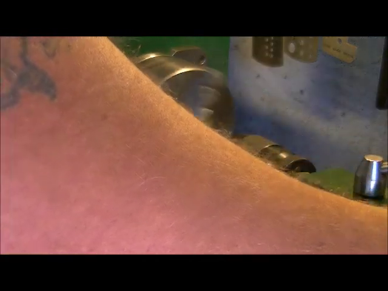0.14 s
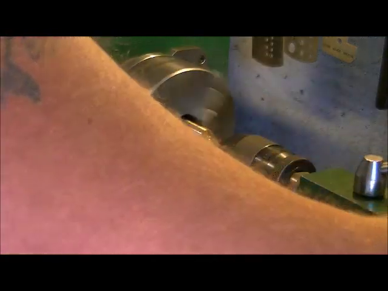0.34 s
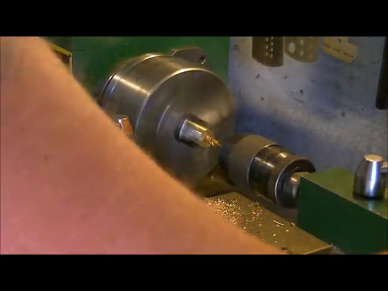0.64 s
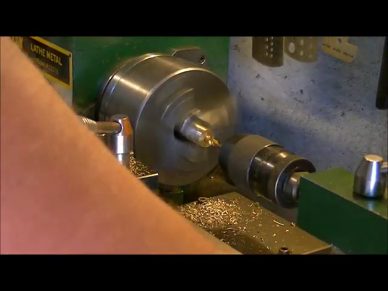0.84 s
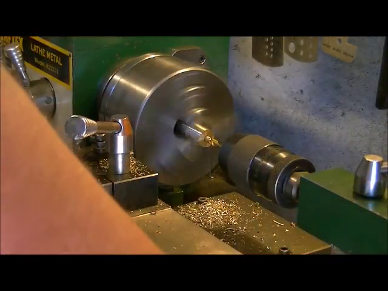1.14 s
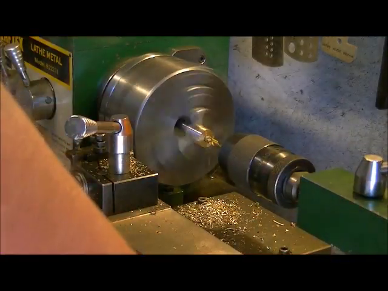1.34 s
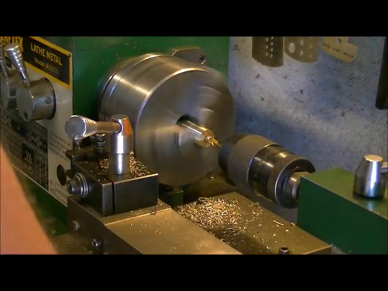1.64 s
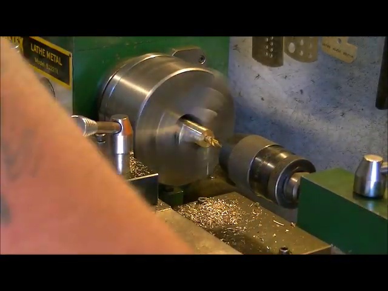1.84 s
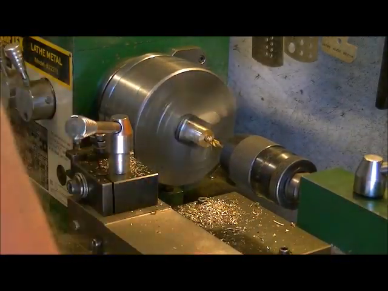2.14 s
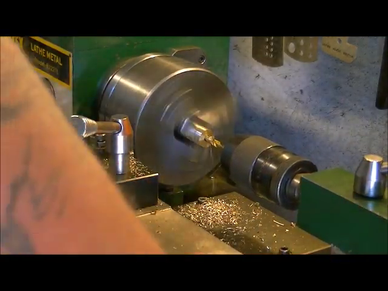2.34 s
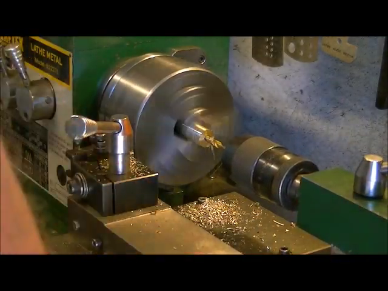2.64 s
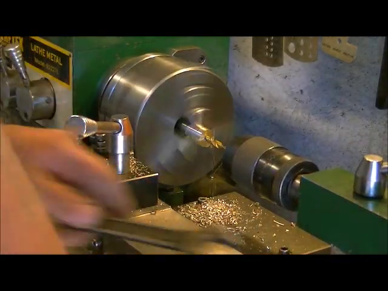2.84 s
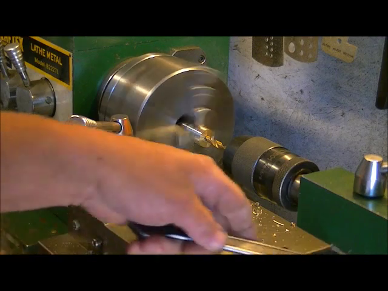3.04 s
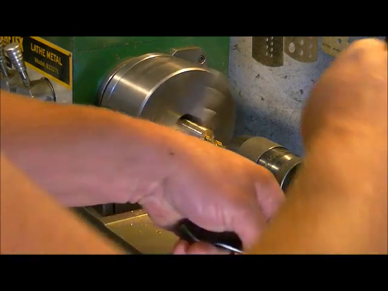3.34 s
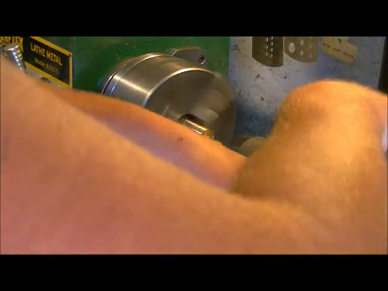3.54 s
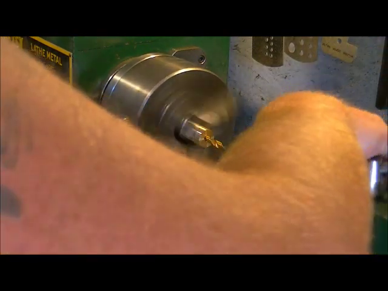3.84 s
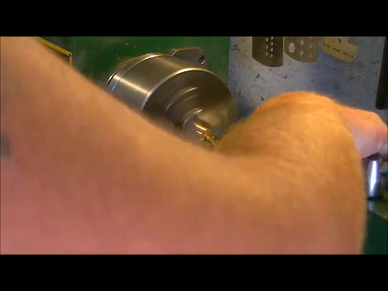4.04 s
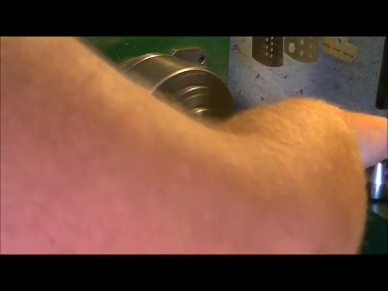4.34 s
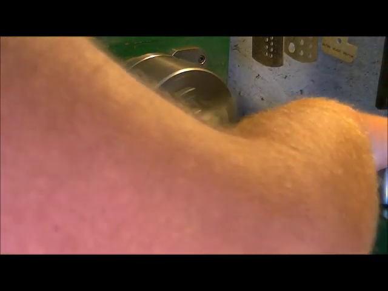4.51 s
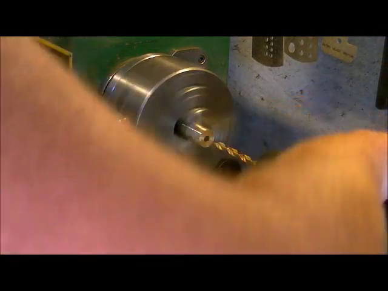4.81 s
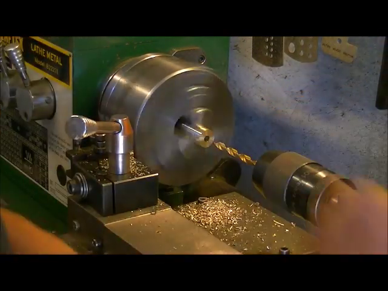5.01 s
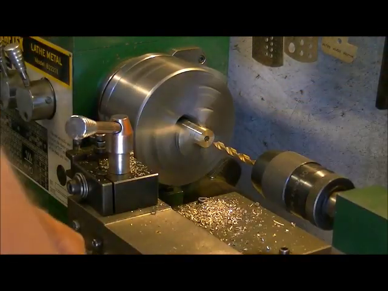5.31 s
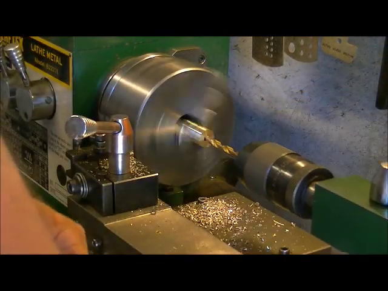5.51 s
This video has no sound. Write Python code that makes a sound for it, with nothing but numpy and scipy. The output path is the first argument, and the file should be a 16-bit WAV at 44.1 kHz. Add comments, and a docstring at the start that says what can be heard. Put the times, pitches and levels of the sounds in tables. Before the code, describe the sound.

A small metal lathe whirs and rattles steadily while a drill bit boring brass squeals high and wavering, then steps upward and stops.

```python
"""Drilling brass on a small lathe

A small benchtop lathe runs steadily while a twist drill bores into spinning brass. Random blows from gear teeth
ring the castings, throbbing with the shafts and the motor's mains pulsation, over a faint hum of sine tones.
The drill's squeal is a wavering tone with overtones that drops in pitch at each bite; near the end, as the drill
is backed out, it steps up and dies. Chips fizz, small parts chatter and tick, and the bench thuds softly."""
import sys
import numpy as np
from scipy import signal
from scipy.fft import rfft, irfft, next_fast_len
from scipy.io import wavfile
from scipy.ndimage import uniform_filter1d

SR = 44100
rng = np.random.default_rng(int(sys.argv[2]) if len(sys.argv) > 2 else 0)


def unload_wav(signal):
    """Save mono or channel-first audio to the path in sys.argv[1] as 16-bit WAV at rate SR, clipped to [-1, 1]."""
    wavfile.write(
        sys.argv[1],
        SR,
        np.round(np.clip(np.atleast_2d(signal).T, -1, 1) * 32767).astype(np.int16),
    )


N = 250047
T = np.arange(N) / SR  # time of each sample in seconds


def undb(db):
    """Turn decibels into a gain."""
    return 10 ** (np.asarray(db) / 20)


def unit(x):
    """Scale a sound to an rms (average strength) of 1."""
    return x / np.sqrt(np.mean(x ** 2))


def curves(table):
    """Join the rows of a timed table by straight lines: one curve per column, one value a sample."""
    seconds, *columns = np.transpose(table)
    return [np.interp(T, seconds, column) for column in columns]


def band(x, lo_hz, hi_hz, order=2):
    """Keep only the pitches between two limits (Butterworth band-pass)."""
    edges_hz = [lo_hz, min(hi_hz, .45 * SR)]
    return signal.sosfilt(signal.butter(order, edges_hz, "band", fs=SR, output="sos"), x)


def fade_60db(t, t60):
    """Die away by 60 dB in t60 seconds, as a struck object or a room does."""
    return np.exp(-np.log(1000) * t / t60)


def walk(rate):
    """Smooth random wander of rms 1, drifting to a new value about rate times a second."""
    hold = max(int(SR / rate), 2)
    steps = np.repeat(rng.standard_normal(N // hold + 1), hold)
    smooth = uniform_filter1d(uniform_filter1d(steps, hold), hold)
    return unit(smooth[:N])


def impacts(per_second, scatter_db):
    """Dense small blows at random moments, uneven in size and random in direction."""
    hit = rng.random(N) < per_second / SR
    direction = rng.choice([-1, 1], N)
    size = undb(scatter_db * rng.standard_normal(N))
    return unit(hit * direction * size)


def castings(x):
    """Ring a force through the machine's resonances; returns the spectrum and its frequencies."""
    # Broad colour of the machine. Each row: frequency in Hz, gain in dB.
    body = [(40, -45), (135, -53), (230, -31), (300, -2.5), (600, 0.5), (1000, -2), (2400, -1.5),
            (3200, -3), (4100, -2), (5400, -11), (7300, -18), (9500, -31.5), (12000, -49), (15000, -80)]
    # Resonances of headstock, bed and covers. Each row: frequency in Hz, width in Hz, lift in dB.
    lathe_modes = [(343.8, 14, 5.5), (435, 22, 6), (508, 10.4, 9.5), (615.7, 16.8, 9), (646.5, 56, 13),
                   (722, 46, 8), (781, 30, 10.5), (842, 18, 4), (899.5, 31, 9), (952, 18, 4.5),
                   (1029, 17, 6), (1133.7, 30, 13.5), (1234, 85, 6), (1281, 25, 9.5), (1384, 80, 7),
                   (1616, 43, 4.5), (1904, 170, 5.5), (2103, 36, 9), (2281, 49, 9.5), (2517, 91, 6.5),
                   (2730, 36, 5), (3010, 23, 4.5), (3840, 39, 3.5), (4106, 54, 6)]
    size = next_fast_len(N + SR // 2, True) * 2
    f = np.arange(size // 2 + 1) * SR / size
    hz, db = np.transpose(body)
    gain_db = np.interp(np.log(f + 1), np.log(hz), db)
    for centre, width, lift in lathe_modes:
        gain_db = gain_db + lift / (1 + (2 * (f - centre) / width) ** 2)
    # minimum phase: every resonance rings after its blow, not before
    cepstrum = irfft(np.log(undb(gain_db)))
    cepstrum[1:size // 2] *= 2
    cepstrum[size // 2 + 1:] = 0
    return rfft(x, size) * np.exp(rfft(cepstrum)), f


def gears(rub_db=-4, scatter_db=2.3, flutter_db=.7, surge_db=.9, swell_db=0.17,
          drone_db=-0.22, rattle_db=0, hiss_db=7.5):
    """Tooth impacts and bearing rub ring the castings, swelling with each turn of the shafts."""
    # Slow levels of the running gear, before the trims drone_db, rattle_db and hiss_db are added.
    # Each row: time in seconds, headstock drone in dB, gear rattle in dB, tooth hiss in dB.
    run = [(0.0, -25, -28.2, -49), (0.7, -25.5, -28.7, -48.5), (1.2, -24.5, -30, -50),
           (1.52, -24.5, -27.5, -52), (1.62, -24, -25, -47), (2.0, -26, -25, -43.5), (2.1, -25, -27, -47.0),
           (2.5, -25, -24.5, -44), (3.15, -23.5, -25.5, -44.5), (3.28, -24.5, -23.5, -42),
           (3.45, -25.5, -26.5, -47), (3.65, -26.5, -26, -43), (3.75, -25, -25, -44),
           (4.1, -23.5, -26, -44), (4.3, -23.5, -24.0, -43.5), (5.67, -23.2, -24, -42.5)]
    # Cyclic load on the gears from the turning shafts and the mains.
    # Each row: rate in Hz, first crest in seconds, depth in the drone, in the rattle, in the hiss (shares of 1).
    throbs = [ (6.39, .129, .01, .025, .03), (14.3, .033, .035, .08, .15), (18.63, .022, .1, .06, .11),
              (35.7, .0165, .05, .1, .11), (120, .0036, .1, .07, .08), ]
    force = impacts(3000, scatter_db) + undb(rub_db) * rng.standard_normal(N)
    spectrum, f = castings(force)
    # three regions of the spectrum, meeting at 1500 and 4700 Hz
    above_drone, above_rattle = (1 - 1 / (1 + (f / hz) ** 12) for hz in (1500, 4700))
    shares = (1 - above_drone, above_drone - above_rattle, above_rattle)
    trims_db = (drone_db, rattle_db, hiss_db)
    backlash_db = flutter_db * walk(60) + swell_db * walk(12)
    out = 0
    for k, (share, db, trim_db) in enumerate(zip(shares, curves(run), trims_db)):
        load = 1
        for rate, crest, *depth in throbs:
            load = load + depth[k] * np.cos(2 * np.pi * rate * (T - crest))
        # loose teeth make the rattle and hiss surge; the heavy headstock (k = 0) drones on evenly
        loose_db = np.sqrt(k) * (backlash_db + surge_db * walk(110))
        layer = irfft(spectrum * share)[:N] * load * undb(loose_db)
        out = out + unit(layer) * undb(db + trim_db)
    return out


def boom(x, edge_hz=340):
    """The lowest part of the drone slowly loses weight."""
    # Gain of everything below the edge. Each row: time in seconds, gain in dB.
    boom_gain = [(0, 2), (1.4, 1.5), (2.4, -1), (3.6, -1), (5.67, -3)]
    low = signal.sosfiltfilt(signal.butter(3, edge_hz, fs=SR, output="sos"), x)
    return x + (undb(curves(boom_gain)[0]) - 1) * low


def motor():
    """Magnetic hum at twice the mains rate and its octave."""
    # Each row: frequency in Hz, rms level in dB.
    hum = [(120, -81.5), (240, -63)]
    return sum(np.sqrt(2) * undb(db) * np.sin(2 * np.pi * hz * T) for hz, db in hum)


def bites(grab_s=.011, let_go_s=.012):
    """Each bite of the lips loads the drill, pulling the pitch down and changing the level; returns Hz and dB."""
    # Each row: start in seconds, length in seconds, drop in pitch at the end in Hz,
    # drop at the start as a multiple of that, lift of the squeal in dB, change in level on letting go in dB.
    bite_table = [(0, 0.046, 115, 1, -0.5, 2), (0.099, 0.091, 292, .15, 3.5, 0),
                  (0.189, .038, 110, 1, 1, 3), (0.261, 0.075, 320, .2, 4, -3),
                  (.326, 0.025, 221, 1, 9.5, -2), (.348, 0.031, 190, 1, 1, -3), (0.407, .028, 100, 1, 0, 0),
                  (.469, 0.035, 330, .8, 8, -6), (.563, 0.029, 292, .95, -3, 6),
                  (.618, 0.047, 300, .45, 6, 1), (.717, .026, 259, 1, -2, 3), (.774, .046, 330, 1.05, 5, 0),
                  (.832, .024, 130, 1, -3, 4), (0.866, .036, 311, 1, 0, 2), (0.926, 0.053, 370, .7, 7, -1),
                  (0.98, 0.091, 321, .95, -4, 5), (1.079, .046, 322, 1, 7.5, 3),
                  (1.134, 0.029, 200, 1, 4, -5), (1.165, .068, 370, .7, -3.5, -4),
                  (1.221, .056, 299, .55, 4, 2), (1.297, 0.13, 385, .95, 0, 3),
                  (1.437, 0.15, 370, 1.1, 2, 0), (1.606, 0.025, 130.5, 1, -1, 1),
                  (1.646, .052, 400, .9, 2, 1), (1.712, .034, 303, .9, 5, 0),
                  (1.785, 0.055, 375, .4, -3, -2), (1.861, 0.031, 149, 1, 0, 0),
                  (1.976, .034, 171, .7, 4, 1), (2.113, .056, 180.4, .6, 4, -1),
                  (2.286, .036, 190, .9, -1, 0), (2.563, .08, 90.3, .8, 2, 4),
                  (2.683, .065, 230, .1, 1, -13), (2.825, 0.029, 380, 1, 1, -5),
                  (2.841, 0.062, 260, 1.1, -1.5, -3), (2.981, 0.082, 241, 1, 4, -6),
                  (3.131, 0.07, 617, .72, 0, -12), (3.178, 0.051, 200, 1, -2, 2),
                  (3.276, 0.13, 670, .68, 3.5, -12), (3.426, 0.099, 630, .58, 3.5, -13),
                  (3.581, .03, 470, 1, -2, -6), (3.598, 0.089, 619, .5, 3, -14),
                  (3.708, 0.052, 471, .62, -3, 4), (3.75, 0.084, 623, .5, 5, -18),
                  (3.901, 0.1, 611, .42, 5.5, -16), (4.048, .088, 470, .72, 4, -18),
                  (4.224, 0.036, 269, 1, 2, -8), (4.275, 0.061, 320, .3, 4, -12)]
    sag_hz, lift_db = np.zeros((2, N))
    for s, length, depth_hz, at_once, db, break_db in bite_table:
        corners = s + np.sort([0, grab_s, length - let_go_s, length])
        depth = np.interp(T, corners, [0, at_once, 1, 0])
        letting_go = np.exp(-((T - corners[2:].mean()) / (0.46 * let_go_s)) ** 2)
        sag_hz += depth_hz * depth
        lift_db += db * depth + break_db * letting_go
    return sag_hz, lift_db


def cling(hz, reach_hz=75.4, share=.45):
    """The drill's resonances draw the pitch partly towards them; returns the pitch and the change in level in dB."""
    # Resonances of the drill. Each row: frequency in Hz, lift of the squeal in dB.
    drill_modes = [(4470, -1), (4700, 1), (4870, 1.5), (5180, 0)]
    pulled, ring_db = hz, 0
    for mode_hz, db in drill_modes:
        near = np.exp(-((hz - mode_hz) / reach_hz) ** 2)
        pulled = pulled - min(share, 1) * near * (hz - mode_hz)
        ring_db = ring_db + db * near
    return pulled, ring_db


def stick_slip(hz, ragged, hop_hz=72, tremble_hz=40, shaft_hz=12, waver_hz=16):
    """Phase of the squeal: the pitch wavers with the load, hops as chips break off and trembles between hops."""
    # The gear shaft that sways the pitch: rate in Hz, first crest in seconds.
    shaft_rate, shaft_crest = (18.63, .036)
    chip = np.cumsum(rng.random(N) < 190 / SR)  # running count of chips, about 190 a second
    hops = uniform_filter1d(rng.uniform(-1, 1, N)[chip], size=SR // 600)
    tremble = walk(650)
    shaft_sway = shaft_hz * np.cos(2 * np.pi * shaft_rate * (T - shaft_crest))
    waver = waver_hz * walk(80) + shaft_sway
    pitch_hz = hz + waver + ragged * (hop_hz * hops + tremble_hz * tremble)
    return 2 * np.pi * np.cumsum(pitch_hz) / SR


def drill(flicker_db=3.1, overtone_flicker_db=3.5, squeal_db=-1.14, chips_db=-36.5, rasp_db=-18.5,
          harsh_db=5.5, steady_hz=450, resonance_hz=5085, fade_db_per_hz=0.08, rub_db=-10.5):
    """The cutting lips stick and slip at a resonance of the drill, over a faint fizz of fine chips."""
    # How the feed sets the squeal: higher as the pressure eases, climbing in steps as the drill is backed out.
    # Each row: time in seconds, pitch between bites in Hz before the resonances pull it,
    # starting level in dB before the other level changes, raggedness (0 is smooth, higher is rougher).
    feed = [(0, 4790, -30, 0.63), (.08, 4793, -26, 0.75), (.25, 4780, -25.5, .6), (.47, 4755, -26.5, 0.81),
            (.497, 4970, -29, 1), (.52, 4800, -22, .8), (.555, 4880, -26.5, .8), (.6, 4760, -26.5, 0.86),
            (.685, 4800, -28, 0.86), (.71, 4890, -26, .8), (.755, 4780, -26.5, 0.74),
            (.86, 4860, -30, 0.93), (.91, 4810, -28, 1), (1.08, 4856, -27, 1), (1.45, 4844, -27.5, 1),
            (1.6, 4870, -31, 1), (1.76, 5080, -30, 0.96), (1.91, 5020, -24.5, 0.42),
            (1.97, 4970, -30.5, 0.48), (2.02, 5090, -25.5, .45), (2.11, 4934, -25, .5),
            (2.2, 4950, -26, 0.47), (2.255, 5080, -22.5, 0.5), (2.34, 4940, -26.5, .45),
            (2.4, 5024, -24.5, 0.49), (2.55, 4953, -26.5, 0.58), (2.72, 4920, -27, 0.63),
            (2.78, 5330, -28, 1), (2.93, 5440, -27, 1.0), (3.25, 5360, -25, 1.05), (3.42, 5336, -27, 1.1),
            (3.55, 5224, -25.5, 1.11), (3.87, 5186, -27, 1.2), (4.17, 5175, -31.5, 1.2),
            (4.322, 5030, -39, 1.3), (4.335, 5400, -28, 1.2), (4.392, 5380, -25, 1.1),
            (4.403, 5700, -26, 1.2), (4.432, 5800, -26.5, 1.3), (4.468, 6160, -27, 1.3),
            (4.495, 6150, -29, 1.3), (4.58, 6130, -31, 1.4)]
    # Parts of the tone. Each row: multiple of the pitch, level in dB added to the level worked out below.
    partials = [(1, 0), (2, -20), (3, -40)]
    free_hz, feed_db, ragged = curves(feed)
    sag_hz, lift_db = bites()
    hz, ring_db = cling(free_hz - sag_hz)
    # above the resonance the fundamental fades to a thin rub
    fade_db = np.clip(fade_db_per_hz * (resonance_hz - hz), rub_db, 0)
    db = feed_db + lift_db + ring_db + fade_db
    cutting = np.clip((feed[-1][0] - T) / .05, 0, 1)  # fades out over the last 0.05 s of the feed
    # a deep bite steadies the tone
    phase = stick_slip(hz, ragged / (1 + (sag_hz / steady_hz) ** 2))
    tone = 0
    for multiple, partial_db in partials:
        if multiple == 1:
            # the more ragged the cut, the more the squeal flickers
            level_db = db + ragged * flicker_db * walk(170)
        else:
            # overtones weaken only about half as much as the fundamental
            level_db = -26.0 + 0.49 * (db + 26.5) + overtone_flicker_db * walk(90)
            # they fade when the drill only rubs and sings high
            level_db = level_db - 0.016 * np.maximum(hz - 5450, 0)
            # a ragged cut is brighter
            level_db = level_db + harsh_db * (np.minimum(ragged, 1.2) - .9)
        rasp = 1 + multiple * ragged * undb(rasp_db) * walk(900)
        tone = tone + np.sqrt(2) * undb(level_db + partial_db) * rasp * np.sin(multiple * phase)
    # fine chips fizz, growing until about 1.85 s and then dropping back to a trace
    fizz_strength = np.interp(T, [.6, 1.1, 1.85, 2.15], [.08, 0.8, 1.2, .1])
    fizz = unit(band(impacts(2500, 4), 10500, 14800, order=4))
    chips = fizz * undb(db + chips_db) * fizz_strength
    return cutting * (undb(squeal_db) * tone + chips)


def surges(x, octaves=0.42):
    """The rattle briefly swells or slackens in one part of the machine, each time in a band about an octave wide."""
    # Each row: middle in seconds, length in seconds, centre in Hz, peak change in dB.
    surge_table = [(.085, .04, 650, 5), (0.92, .04, 2300, 5.5), (1.486, 0.051, 1260, 4.5),
                   (1.973, 0.044, 2300, 4), (2.046, 0.03, 1303, 5), (2.346, .035, 2700, 4),
                   (2.77, .04, 649, 5.5), (2.786, .05, 2310, -6), (2.901, .04, 2400, 4.5),
                   (3.023, 0.03, 650, 5), (3.117, .035, 2490, 4), (3.247, .045, 1250, 2),
                   (3.436, .035, 1250, 6), (3.47, 0.028, 1990, -8), (3.616, 0.056, 1297, -4),
                   (3.685, .04, 2290, -7), (3.74, 0.034, 2300, 2), (4.07, 0.04, 1250, 5),
                   (4.787, 0.033, 5500, 3), (4.853, 0.031, 650, 5), (5.13, 0.056, 1250, 4.5),
                   (5.272, 0.036, 600, 7), (5.552, 0.03, 6000, 6.5)]
    out = x.copy()
    for s, length, hz, db in surge_table:
        at = slice(int((s - length / 2) * SR), int((s + length / 2) * SR))
        piece = x[at]
        f = np.fft.rfftfreq(len(piece), 1 / SR)
        nearness = np.exp(-(np.log2((f + 1) / hz) / octaves) ** 2)
        part = irfft(rfft(piece) * nearness, len(piece))
        out[at] += (undb(db) - 1) * np.hanning(len(piece)) * part
    return out


def chatters(width_hz=900, scatter_db=5.5):
    """Flurries of small blows rattle a steel part for a few hundredths of a second."""
    # Each row: start in seconds, length in seconds, centre in Hz, level in dB before the swell and fade.
    chatter_table = [(0.115, .025, 3700, -27), (0.426, .023, 3820, -24), (1.347, 0.033, 3600, -25),
                     (1.566, 0.023, 3720, -26), (1.771, 0.021, 3700, -27), (1.823, 0.024, 3700, -26),
                     (3.096, 0.039, 4100, -30), (3.864, 0.023, 3710, -22.5), (4.773, .034, 3570, -22.5),
                     (4.923, .036, 3650, -24), (5.067, .022, 3380, -27), (5.538, .023, 3700, -26)]
    out = np.zeros(N)
    blows = band(impacts(1300, scatter_db), 1800, 5200)
    for s, length, hz, db in chatter_table:
        at = slice(int(s * SR), int((s + length) * SR))
        ring = unit(band(blows, hz - width_hz / 2, hz + width_hz / 2, order=1)[at])
        swell_and_fade = np.sin(np.linspace(0, np.pi, len(ring)))
        out[at] += undb(db) * ring * swell_and_fade
    return out


def thuds():
    """Dull, deep bumps carried through the bench as the tailstock is handled: short swells of low noise."""
    # Each row: start in seconds, length in seconds, level in dB before the swell and fade.
    thud_table = [(3.575, .05, -69), (4.89, .05, -69), (4.975, .04, -71)]
    # Lower and upper limit of the rumble in Hz.
    thud_band = (35, 105)
    out = np.zeros(N)
    rumble = band(rng.standard_normal(N), *thud_band)
    for s, length, db in thud_table:
        at = slice(int(s * SR), int((s + length) * SR))
        out[at] += undb(db) * unit(rumble[at]) * np.hanning(len(rumble[at]))
    return out


def ticks(knock_db=0, ring_db=1.0, crack_db=0.0):
    """Hard little contacts chatter into the castings and set a steel part ringing briefly."""
    # Metal knocks. Each row: start in seconds, strength in dB, seconds for the chatter to fall 60 dB,
    # share of ring (0 to 1).
    tick_table = [(3.602, -15.3, .03, .75), (4.993, -19, .02, .18)]
    # What the steel part rings with. Each row: frequency in Hz, strength in dB, seconds to fall 60 dB.
    tick_modes = [(3840, -.5, .065), (4064, -5, .046), (4867, -7, .15), (6680, -1, 0.039),
                  (7250, -2.5, .027), (7840, -8, .02), (9760, -19, .02), (11900, -14, .015)]
    force, cracks, rings = np.zeros((3, N + SR))
    t = T[:SR // 4]
    modes = sum(undb(db) * np.sin(2 * np.pi * hz * t) * fade_60db(t, t60) for hz, db, t60 in tick_modes)
    # the ring builds up during the brief contact
    modes = modes * np.minimum(t / .0003, 1)
    for s, db, t60, ring in tick_table:
        at = slice(int(s * SR), int(s * SR) + len(t))
        contact = undb(db) * rng.standard_normal(len(t)) * fade_60db(t, t60)
        force[at] += contact
        cracks[at] += ring * contact
        rings[at] += undb(db) * ring * modes
    knock = irfft(castings(force[:N])[0])[:N]
    # the steel part itself gives off a bright crack
    crack = undb(crack_db) * band(cracks[:N], 3500, 8200)
    together = 2 * undb(knock_db) * knock + crack + undb(ring_db) * rings[:N]
    return band(together, 1900, 12500, order=3)


def workshop(x, t60):
    """Scattered reflections from the bench and the near wall: a fading tail of noise, silent for the first 2 ms."""
    t = T[:SR // 4]
    tail = rng.standard_normal(len(t)) * fade_60db(t, t60) * (t > .002)
    return signal.fftconvolve(x, tail / np.sqrt(np.sum(tail ** 2)))[:N]


def scene(room_db=-5.5, side_db=-20.0):
    """Everything is close and nearly straight ahead; the squeal lingers between bench and wall."""
    # Lean of the sound to one side. Each row: frequency in Hz, left minus right in dB (about).
    lean_table = [(120, -1), (300, 0.4), (600, 0.5), (1200, 0.1), (2400, 0.2), (5000, -0.5), (9000, 0)]
    cut = drill() + ticks() + chatters()
    lingering = workshop(cut, t60=.13)
    mid = surges(boom(gears())) + motor() + thuds() + cut + undb(room_db) * lingering
    hz, lean_db = np.transpose(lean_table)
    f = np.arange(N // 2 + 1) * SR / N
    lean = undb(np.interp(f, hz, lean_db) / 2) - 1
    # the channels differ by a slight lean and by the reflections of the shorter waves
    reflections = band(workshop(mid, t60=0.078), 500, 18000, order=1)
    side = irfft(rfft(mid) * lean, N) + undb(side_db) * reflections
    return np.array([mid + side, mid - side])


def record(dry, bass_hz=75, top_hz=15700):
    """The microphone passes neither deep bass nor the very top."""
    thinned = signal.sosfilt(signal.butter(2, bass_hz, "high", fs=SR, output="sos"), dry)
    return signal.sosfilt(signal.ellip(10, .1, 80, top_hz, fs=SR, output="sos"), thinned)


dry = scene()
out = record(dry)
unload_wav(out)
```